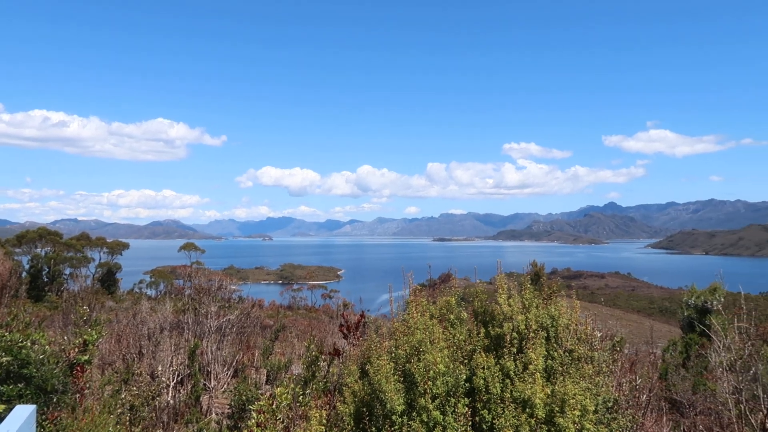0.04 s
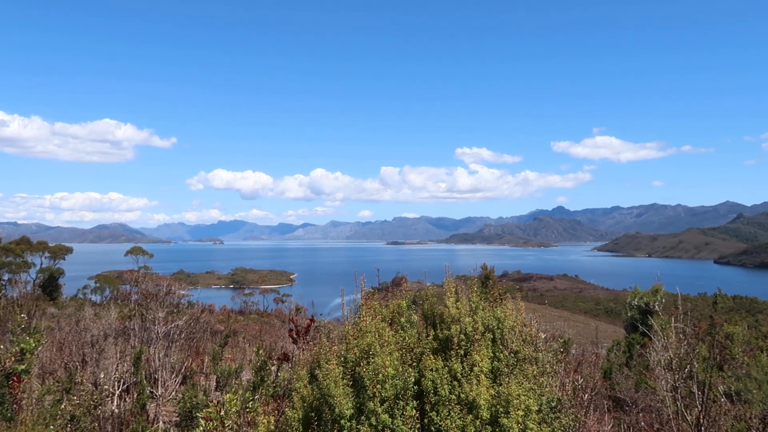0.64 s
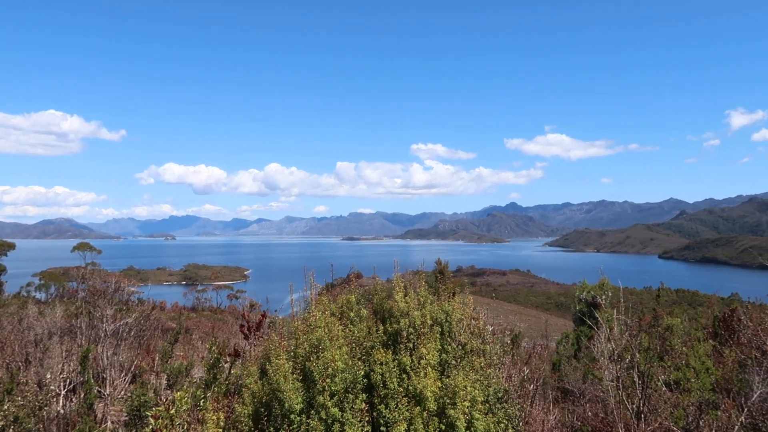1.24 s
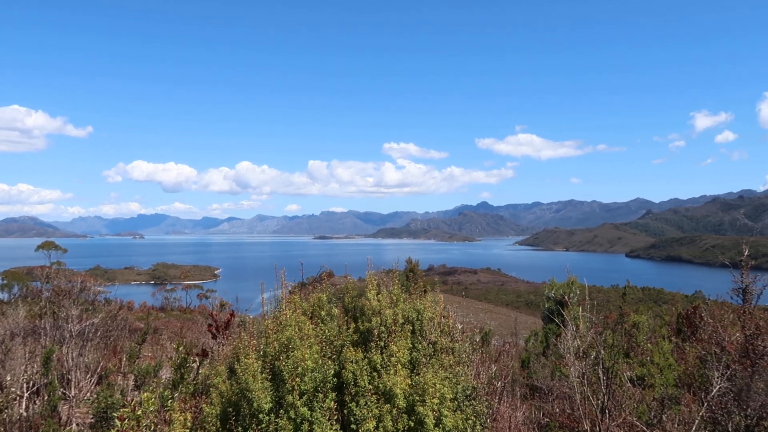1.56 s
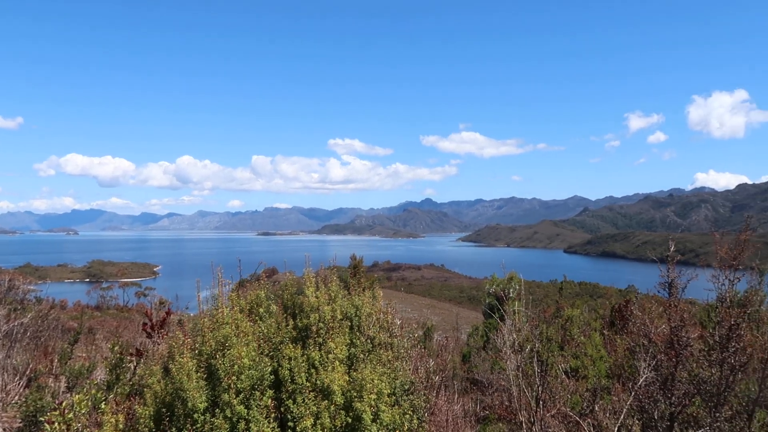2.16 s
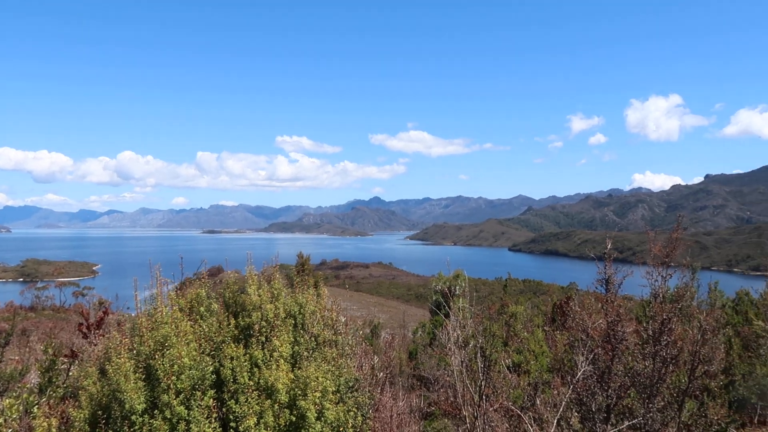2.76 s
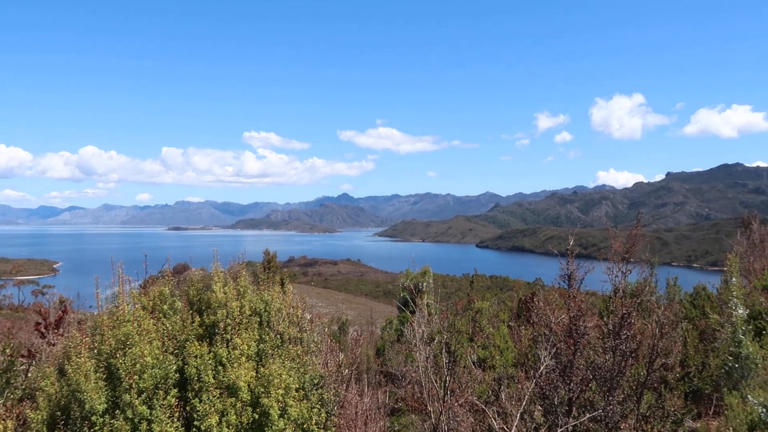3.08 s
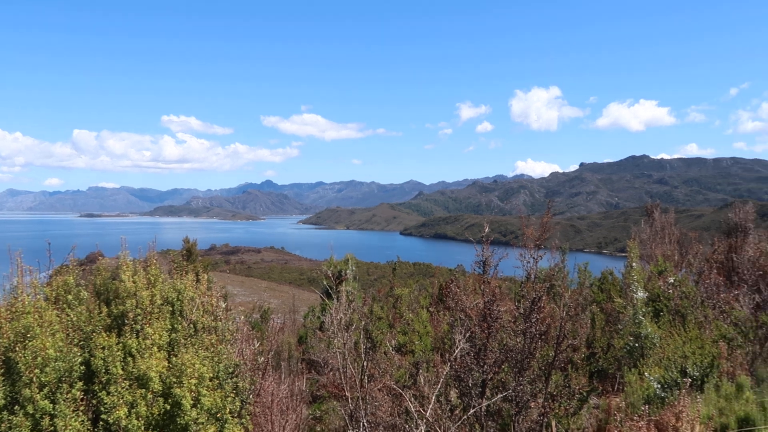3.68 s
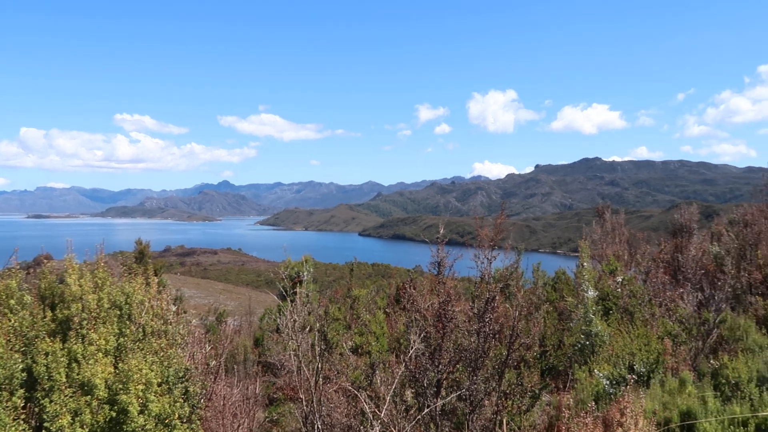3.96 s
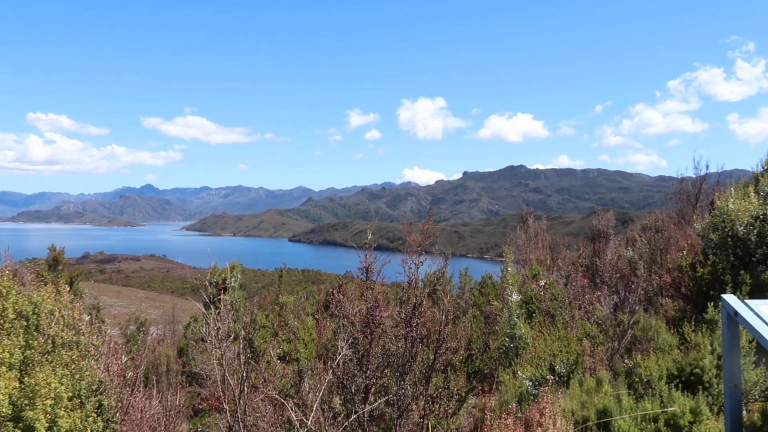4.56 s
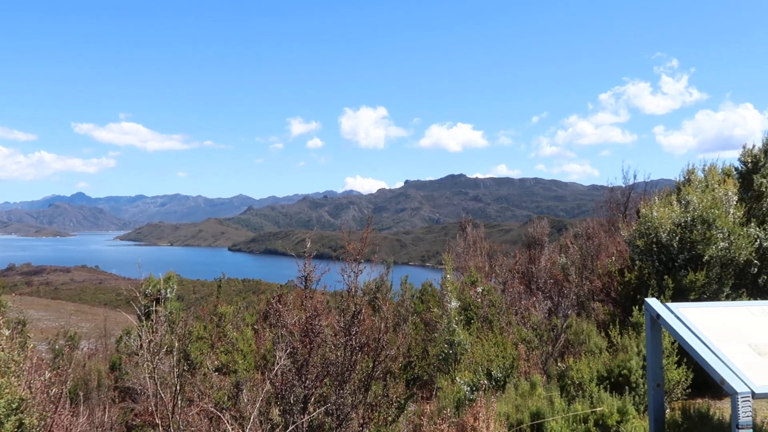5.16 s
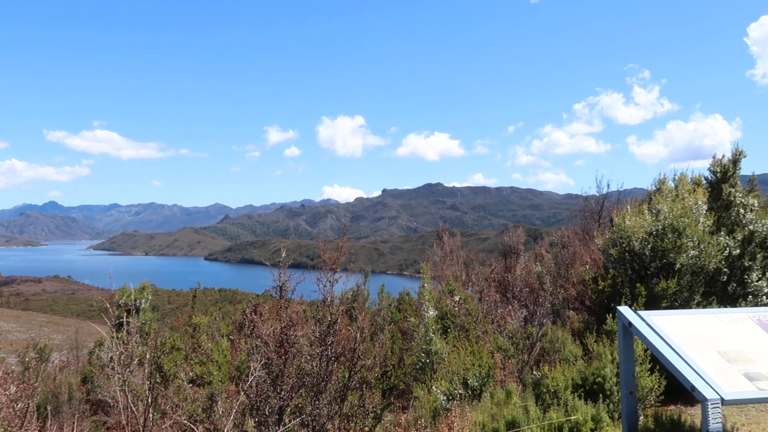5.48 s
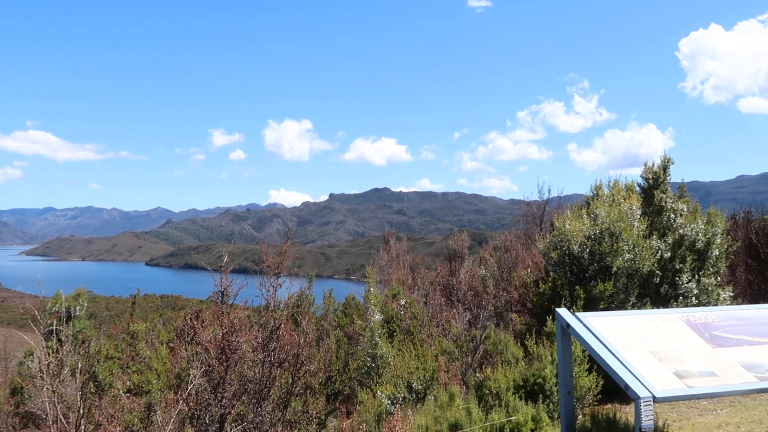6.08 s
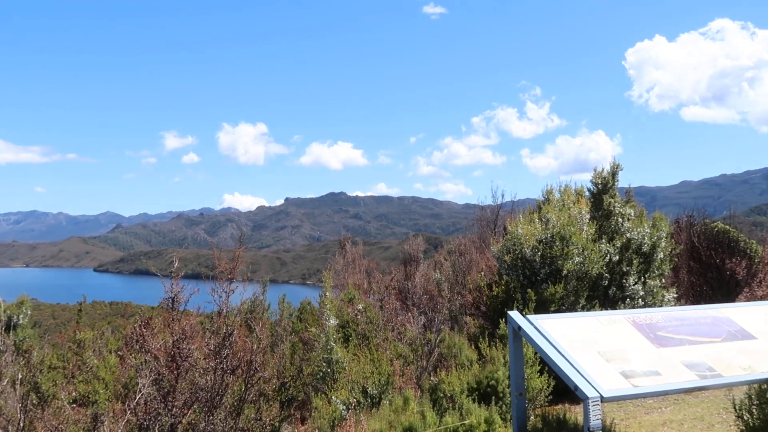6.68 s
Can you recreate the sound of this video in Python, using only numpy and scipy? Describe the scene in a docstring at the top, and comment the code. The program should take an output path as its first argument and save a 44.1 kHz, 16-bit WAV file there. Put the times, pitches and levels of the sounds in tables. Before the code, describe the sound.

On an open hilltop, wind buffets the microphone with low thumps, hardest at the very start. It drops back to a wide, steady rush of air and the drone of a distant machine, probably a generator. A quick cluster of tiny ticks, like a dry twig snapping, comes just past the middle. Lighter gusts then return, and the drone throbs a little louder toward the end.

```python
"""Gusts of light wind buffet and thump a microphone on an open hilltop, hardest at the start.
Their eddies press directly on the diaphragm of a slowly turning hand-held camera. Behind them lie a wide
rush of turbulent air and the drone of a far machine, likely a generator with a cooling fan, whose firing
strokes and blades give harmonic series. A few tiny ticks ring close by, over faint electronic noise."""
import sys
import numpy as np
from scipy import signal
from scipy.fft import rfft, irfft, next_fast_len
from scipy.io import wavfile
from scipy.ndimage import uniform_filter1d

SR = 44100
rng = np.random.default_rng(int(sys.argv[2]) if len(sys.argv) > 2 else 0)


def generate_wav(sig):
    """Save sig (samples, or channels by samples) to the path in sys.argv[1] as 16-bit PCM at SR."""
    pcm = np.round(np.clip(np.atleast_2d(sig).T, -1, 1) * 32767).astype(np.int16)
    wavfile.write(sys.argv[1], SR, pcm)


N = 301203
TIME = np.arange(N) / SR
FIRING_HZ = 24.83

# Relative strength of the rushing air: time_s, body_db, hiss_db
AIR_LEVELS = [(0, -38, -57), (.2, -39.5, -54), (.5, -35, -52.5), (1.6, -35.5, -51.5), (2.1, -35.5, -51),
              (3.5, -34.5, -49.5), (4.6, -34.5, -48), (5.9, -33.5, -48), (6.6, -33.5, -48),
              (6.83, -34, -47)]
# Resting strength of the exhaust boom: time_s, level_db
BOOM_LEVELS = [(0, -37), (.85, -34), (1.1, -35), (2.8, -34), (3.5, -36), (4.5, -34), (5.0, -33.5),
               (6.3, -31.5), (6.83, -30.5)]


def amp(db):
    """Amplitude ratio of a level in decibels."""
    return 10 ** (np.asarray(db) / 20)


def unit(x):
    """Normalisation to rms 1."""
    return x / np.sqrt(np.mean(x ** 2) + 1e-20)


def curve(rows, column=1):
    """Linear interpolation of one column of a time table at every sample."""
    columns = np.transpose(rows)
    return np.interp(TIME, columns[0], columns[column])


def colour(x, spectrum):
    """Spectral shaping by a curve on a log-frequency axis, at rms 1."""
    hz, db = np.transpose(spectrum)
    size = next_fast_len(N)
    shape_db = np.interp(np.log(np.fft.rfftfreq(size, 1 / SR) + 1), np.log(hz + 1), db)
    return unit(irfft(rfft(x, size) * amp(shape_db), size)[:N])


def lowpass(x, hz, order):
    """Zero-phase low-pass: filtering forward and backward cancels the delay."""
    return signal.sosfiltfilt(signal.butter(order, min(hz, .45 * SR), fs=SR, output="sos"), x)


def resonance(hz, width_hz, order=1):
    """A resonator driven by white noise, at rms 1; a higher order has steeper skirts."""
    section = np.concatenate(signal.iirpeak(hz, hz / width_hz, fs=SR))
    return unit(signal.sosfilt([section] * order, rng.standard_normal(N)))


def drift(top_hz):
    """Random fluctuation of rms 1: a superposition of slow sines spanning one decade."""
    t = TIME[::100]
    rates_hz = np.geomspace(top_hz / 10, top_hz, 20)
    waves = sum(np.sin(2 * np.pi * (hz * t + rng.random())) / np.sqrt(hz) for hz in rates_hz)
    return unit(np.interp(TIME, t, waves))


def throb(rate_hz=8.6):
    """Uneven amplitude modulation, at rms 1, of sound that travels through moving air."""
    return unit(np.tanh(resonance(rate_hz, rate_hz, order=2)))


def tones(base_hz, partials, wander_hz, fade_db):
    """Harmonics of a governed shaft; each fades in and out on its path through moving air."""
    cycles = np.cumsum(base_hz + wander_hz * drift(1.99)) / SR
    out = np.zeros(N)
    for harmonic, db in partials:
        peak = np.sqrt(2) * amp(db + fade_db * drift(4))
        out += peak * np.sin(2 * np.pi * (round(harmonic) * cycles + rng.random()))
    return out


def electronics(whine_hz=13012, waver_hz=6, hiss_db=-73):
    """Self-noise of the camera: a steady hiss and a thin, frequency-modulated whine."""
    # Strength of the whine: time_s, level_db
    whine_levels = [(0, -93), (3, -91), (4.2, -88.5), (6.83, -88)]
    # Spectrum of the microphone hiss: frequency_hz, relative_density_db
    hiss_spectrum = [(100, -4), (9500, 2.5), (11500, -3.5), (12700, -13.5), (14500, -33)]
    whine = np.sqrt(2) * np.sin(2 * np.pi * np.cumsum(whine_hz + waver_hz * drift(30)) / SR)
    hiss = colour(rng.standard_normal(N), hiss_spectrum)
    return amp(curve(whine_levels)) * whine + amp(hiss_db) * hiss


def eddies(depth_db):
    """Turbulent noise: its level wanders in small patches of time and frequency."""
    spectra = signal.stft(rng.standard_normal(N), nperseg=1024, noverlap=768)[2]
    patches = uniform_filter1d(rng.standard_normal(spectra.shape), size=12, axis=0)
    patches = unit(uniform_filter1d(patches, size=12, axis=1))
    return signal.istft(spectra * amp(depth_db * patches), nperseg=1024, noverlap=768)[1][:N]


def rush(split_hz=2150, end_lag_samples=0.54):
    """Broadband flow noise of air over scrub; its hiss grows slowly and spreads between the ears."""
    # Spectrum common to both ears: frequency_hz, relative_density_db
    mid_spectrum = [(15, -38), (60, -25.5), (160, -17.5), (230, -5.5), (420, -3), (570, -4), (790, 1.7),
                    (1030, -8), (1350, -9), (1900, -16), (2900, -20.5), (4600, -28), (6900, -41.5),
                    (10300, -53), (12500, -63.5), (14000, -76)]
    # Spectrum of the difference between the ears: frequency_hz, relative_density_db
    side_spectrum = [(60, -20.5), (200, -32), (600, -29.5), (1000, 5), (2200, 11), (4200, 5.5),
                     (7000, -1.5), (10000, -5.5), (14500, -9.5)]
    body_db, hiss_db = curve(AIR_LEVELS, column=1), curve(AIR_LEVELS, column=2)
    noise = colour(eddies(depth_db=.4), mid_spectrum)
    low = lowpass(noise, split_hz, order=2)
    treble_db = hiss_db - hiss_db.mean() + body_db.mean() + 0.58
    mid = amp(body_db + 1.5) * low + amp(treble_db) * (noise - low)
    side = amp(hiss_db - 7.5) * colour(rng.standard_normal(N), side_spectrum)
    # Interaural delay: as the camera turns, the left ear lags slightly.
    lag_samples = end_lag_samples * (TIME / TIME[-1]) ** 2
    side -= lag_samples / 2 * np.gradient(mid)
    return np.array([mid + side, mid - side])


def engine(throb_db=2.5):
    """Periodic firing gives a harmonic series, whose upper tones swell with the exhaust boom."""
    # Engine tones, relative to the boom: harmonic_number, level_db
    partials = [(8, -17), (16, -19.5), (20, -19), (24, -18), (28, -22.5), (40, -25.5)]
    gain = amp(curve(BOOM_LEVELS) + throb_db * throb())
    return gain * tones(FIRING_HZ, partials, wander_hz=0.033, fade_db=2.0)


def whirr(follow=1.1):
    """Narrow resonances of the machine, driven by noise; they grow with the hiss of the air."""
    # Resonances: centre_hz, width_hz, level_db
    bands = [(1275, 124, -49), (1460, 69, -54), (1884, 50, -66), (2416, 120, -61), (2613, 150, -62)]
    hiss_db = curve(AIR_LEVELS, column=2)
    ringing = sum(amp(db) * resonance(hz, width_hz, order=2) for hz, width_hz, db in bands)
    return amp(follow * (hiss_db - hiss_db.mean())) * ringing


def hum(throb_db=1.5):
    """The lowest harmonics of the firing strokes form a deep hum that swells late."""
    # Tones of the hum: harmonic_number, relative_level_db
    partials = [(1, -11), (2, -12.5), (3, -1.5), (4, -6), (5, -14.5)]
    # Strength of the hum: time_s, level_db
    levels = [(0, -54), (1.6, -55), (4.2, -52.5), (4.8, -44), (5.5, -41), (6.2, -46), (6.83, -46.5)]
    gain = amp(curve(levels) + throb_db * throb())
    return gain * tones(FIRING_HZ, partials, wander_hz=0.07, fade_db=1.5)


def fan(blade_hz=360.7, flutter_db=0.5, blur_db=-11, follow=0.61):
    """Blade-passing tones, the lowest blurred by stirred air; they partly follow the boom's level."""
    # Blade tones: harmonic_number, level_db
    partials = [(1, -38.5), (2, -50.5), (3, -58)]
    boom_db = curve(BOOM_LEVELS)
    blades = amp(flutter_db * throb()) * tones(blade_hz, partials, wander_hz=0.49, fade_db=0.16)
    stirred_air = amp(partials[0][1] + blur_db) * resonance(blade_hz, width_hz=36, order=2)
    return amp(follow * (boom_db - boom_db.mean())) * (blades + stirred_air)


def exhaust(pipe_hz=297, harmonic=12, tone_db=-1.1, throb_db=.9):
    """Turbulent gas excites a pipe resonance and beats against one engine harmonic: a fluttering boom."""
    # Brief swells carried on the wind: centre_s, length_s, rise_db
    surges = [(1.035, 0.091, 4.5), (1.605, .13, 3.5), (2.353, 0.073, 4.5), (2.614, .12, 1),
              (2.824, 0.067, 4), (3.296, 0.045, 4), (4.323, 0.072, 3.5), (4.7, 0.22, 2.5), (4.946, 0.13, 6),
              (5.105, 0.055, 5), (5.22, 0.093, 6.5), (5.447, 0.071, 6), (5.66, 0.18, 6), (5.992, 0.11, 6),
              (6.197, 0.15, 3.5), (6.365, 0.19, 4.5), (6.71, 0.17, 3)]
    gas = unit(lowpass(resonance(pipe_hz, width_hz=44), hz=400, order=3))
    ring = gas + tones(FIRING_HZ, [(harmonic, tone_db)], wander_hz=0.062, fade_db=0.5)
    flutter = ring / np.sqrt(uniform_filter1d(ring ** 2, size=4500))  # only the fast beats remain
    surge_db = sum(db * np.exp(-(2 * (TIME - s) / length_s) ** 4) for s, length_s, db in surges)
    return amp(curve(BOOM_LEVELS) + throb_db * throb() + surge_db) * flutter


def machine():
    """The far drone: a superposition of rotational harmonics and resonant noise."""
    return engine() + whirr() + hum() + fan() + exhaust()


def ticks(ear_phase_rad=0.74, scatter_db=-26, scatter_s=.018):
    """Impulses excite damped modes, as in a snapping twig; nearby surfaces scatter a faint tail."""
    # Modes of a dry twig: frequency_hz, relative_level_db, decay_s
    modes = [(3300, 1, .0005), (4700, 0, .0003), (6400, -5, 0.00037), (9900, -9, .0004),
             (13800, -18, .0002)]
    # Snaps, before the low-pass: start_s, ring_db, pitch_hz, decay_s, crack_db
    snaps = [(1.275, -58, 10500, .0008, -60), (2.024, -44, 7900, .0014, -66),
             (3.322, -46, 7400, .0013, -56), (3.9637, -38, 6300, .0006, -35),
             (3.9688, -39, 10100, .0005, -35.5), (3.9782, -33, 6400, .0006, -37),
             (3.9831, -32, 9350, .0005, -36), (3.9935, -42, 8500, .0005, -45),
             (4.002, -43, 8600, .0008, -45), (4.0086, -36, 8200, .0005, -53)]
    out, t = np.zeros((2, N)), np.arange(4000) / SR
    phases = np.array([[ear_phase_rad], [-ear_phase_rad]])
    crack = sum(amp(db) * np.sin(2 * np.pi * hz * t) * np.exp(-t / decay_s) for hz, db, decay_s in modes)
    for start_s, ring_db, hz, decay_s, crack_db in snaps:
        ring = np.sin(2 * np.pi * hz * t + phases) * np.exp(-t / decay_s)
        scatter = np.diff(rng.standard_normal((2, len(t) + 1))) * np.exp(-t / scatter_s)
        snap = amp(ring_db) * (ring + amp(scatter_db) * scatter) + amp(crack_db) * crack
        start = round(start_s * SR)
        out[:, start:start + len(t)] += snap
    return lowpass(out, hz=11400, order=3)


def gust_level(rise_s=0.032, fall_s=0.047, breeze_db=-68.5):
    """Wind level in dB by power addition: each gust builds, holds and dies back into a faint breeze."""
    # Gusts at the microphone: arrival_s, hold_s, level_db
    gusts = [(0, 0.14, -23.5), (.075, 0.029, -28), (0.2, .02, -27), (0.23, 0.045, -31), (.315, 0.018, -29),
             (0.426, 0.063, -33), (0.725, .01, -49), (0.994, 0.047, -37.5), (1.237, 0.021, -40),
             (2.21, .02, -50), (2.32, .01, -48), (2.593, 0.012, -44.5), (3.045, .012, -42.5),
             (4.432, 0.021, -35.5), (4.52, 0.019, -38), (4.693, 0.034, -39), (4.754, 0.031, -32),
             (4.923, .015, -33), (4.977, 0.038, -32), (5.17, .025, -39), (5.297, 0.03, -32),
             (5.385, 0.022, -34.5), (5.6, 1.2, -58.5)]
    power = amp(breeze_db) ** 2
    for arrival_s, hold_s, db in gusts:
        before_s = np.maximum(arrival_s - TIME, 0)
        after_s = np.maximum(TIME - arrival_s - hold_s, 0)
        envelope = np.exp(-(before_s / rise_s) ** 2 - after_s / fall_s)
        power = power + (amp(db) * envelope) ** 2
    return 10 * np.log10(power)


def swirl(relative_db=-18, follow=2.2, reference_db=-30):
    """Small eddies differ between the ears and grow as a power law of gust strength."""
    # Spectrum of the eddies: frequency_hz, relative_density_db
    spectrum = [(20, -53), (60, -29), (120, -10), (220, 7), (450, -1.5), (700, -9.5), (1300, -20),
                (4000, -44), (12000, -74.5)]
    level_db = reference_db + relative_db + follow * (gust_level() - reference_db)
    return amp(level_db) * colour(rng.standard_normal(N), spectrum)


def thumps(top_hz=560):
    """Pressure transients at the microphone: each dip swings back and dies within a few cycles."""
    # Dips, before filtering: centre_s, peak_db, pitch_hz, rise_cycles, fall_cycles
    dips = [(0.056, -15, 280, 1.7, 2.2), (0.078, -15, 205, 0.76, 0.89), (0.102, -8, 284, 1.6, 1.3),
            (0.187, -14.5, 452, 2.6, 3), (0.198, -16.5, 148, .5, 1.1), (.212, -18, 170, .5, 0.78),
            (0.239, -16.5, 200, 1, 0.97), (.259, -12, 310, .5, .9), (0.3243, -7, 255, 0.62, 0.6),
            (0.332, -12.5, 173, .5, 0.83), (.407, -4.5, 291, 0.47, 1.15), (.415, -13, 189, 0.41, 1.4),
            (4.445, -25.5, 115, .7, 1), (4.885, -19, 104, 0.75, 0.84), (5.409, -24, 85, .8, 1.1)]
    out = np.zeros(N)
    for centre_s, db, hz, rise_cycles, fall_cycles in dips:
        cycles = (TIME - centre_s) * hz
        near = abs(cycles) < 10
        cycles = cycles[near]
        width_cycles = np.where(cycles < 0, rise_cycles, fall_cycles)
        out[near] -= amp(db) * np.cos(2 * np.pi * cycles) / np.cosh(2 * cycles / width_cycles)
    return lowpass(out, top_hz, order=8)


def buffeting(hard_above_db=-32, span_db=1.5, flicker_db=0.5):
    """Turbulent pressure at the microphone: a hard gust sheds smaller eddies and so reaches higher."""
    # Spectrum of a light gust: frequency_hz, relative_density_db
    light_spectrum = [(10, -29), (22, -5), (45, 3.5), (85, 5), (170, 5), (230, -13), (400, -24.5),
                      (600, -66.5)]
    # Spectrum of a hard gust: frequency_hz, relative_density_db
    hard_spectrum = [(10, -49), (25, -15.5), (60, -7.5), (130, -4), (260, -7), (380, -7), (480, -7.5),
                     (540, -39), (900, -71.5), (4000, -110)]
    level_db = gust_level()
    hard_share = 1 / (1 + np.exp((hard_above_db - level_db) / span_db))
    light_flow = np.sqrt(1 - hard_share) * colour(rng.standard_normal(N), light_spectrum)
    hard_flow = np.sqrt(hard_share) * colour(rng.standard_normal(N), hard_spectrum)
    flicker = unit(amp(flicker_db * drift(60)))
    return amp(level_db) * flicker * (light_flow + hard_flow)


def wind(lean=0.27, split_hz=330, leak_hz=36):
    """Large eddies are coherent at both ears; the smaller ones strike the right ear harder."""
    pressure = buffeting() + thumps()
    mid = pressure - lowpass(pressure, leak_hz, order=2)  # the slowest pushes leak past the diaphragm
    side = lean * (mid - lowpass(mid, split_hz, order=1)) + swirl()
    return np.array([mid - side, mid + side])


def scene():
    """Superposition of near wind, far rush and machine, ticks and self-noise."""
    return wind() + rush() + machine() + ticks() + electronics()


def record(dry, fade_s=.004, top_hz=14600):
    """Short fades at both ends, then a linear-phase band limit."""
    fades = np.clip(np.minimum(TIME, TIME[-1] - TIME) / fade_s, 0, 1)
    band_limit = signal.firwin(511, top_hz, window=("kaiser", 9), fs=SR)
    return signal.oaconvolve(dry * fades, band_limit[None], "same")


dry = scene()
out = record(dry)
generate_wav(out)
```